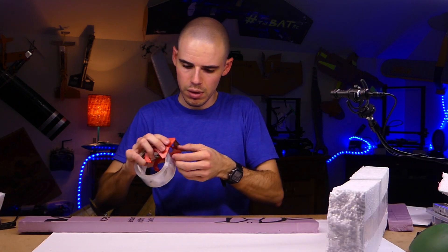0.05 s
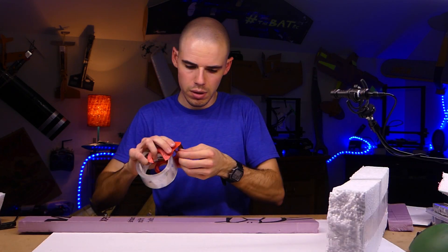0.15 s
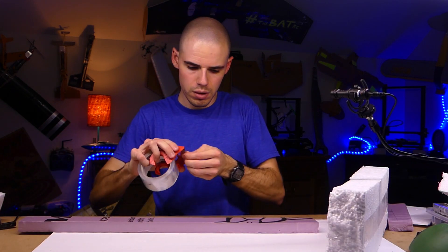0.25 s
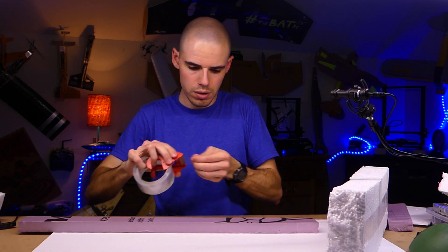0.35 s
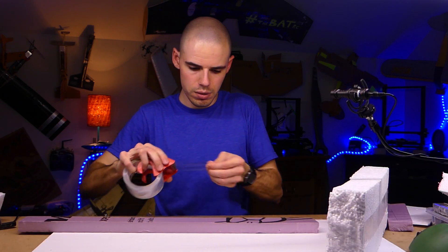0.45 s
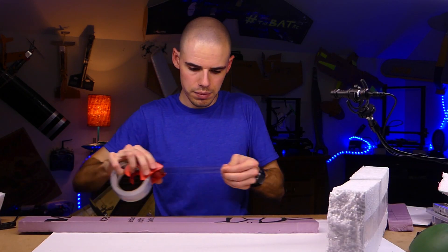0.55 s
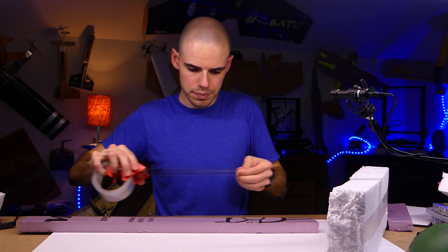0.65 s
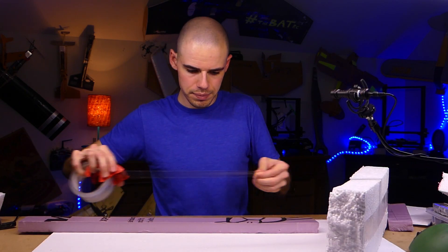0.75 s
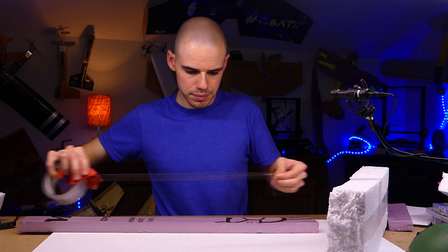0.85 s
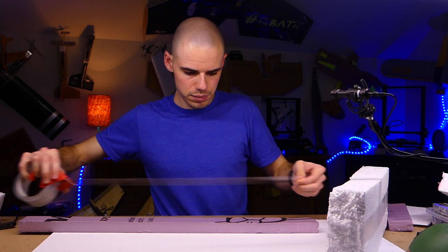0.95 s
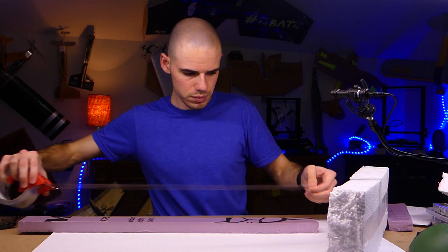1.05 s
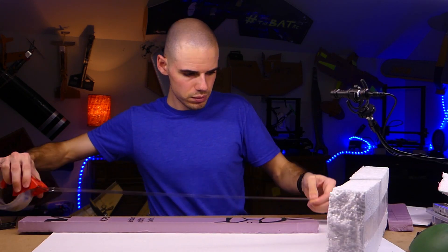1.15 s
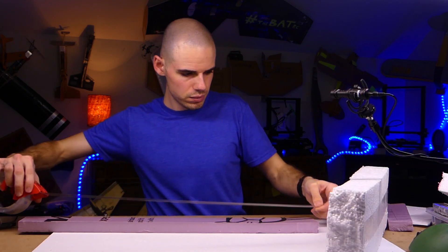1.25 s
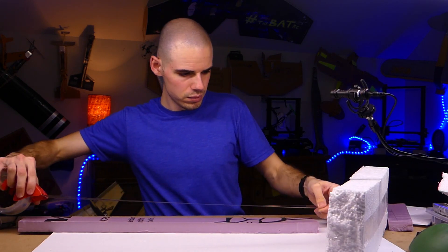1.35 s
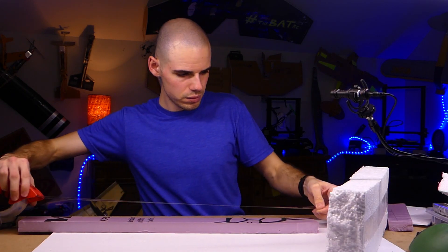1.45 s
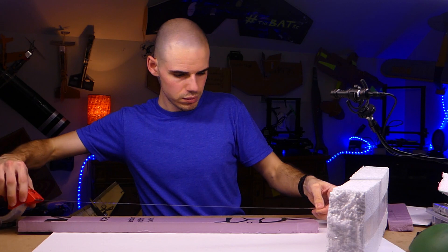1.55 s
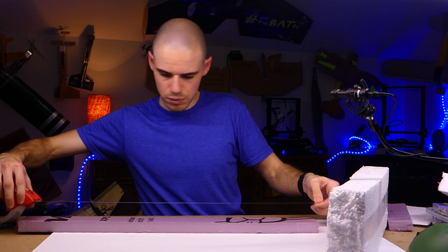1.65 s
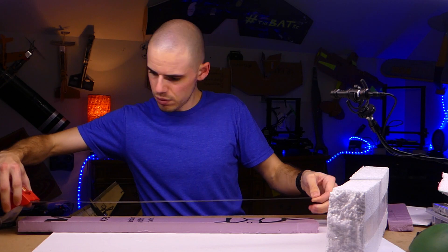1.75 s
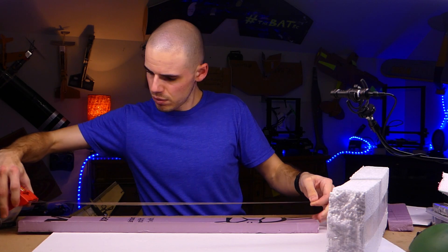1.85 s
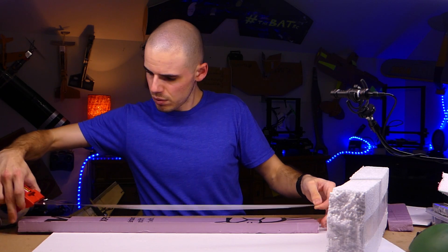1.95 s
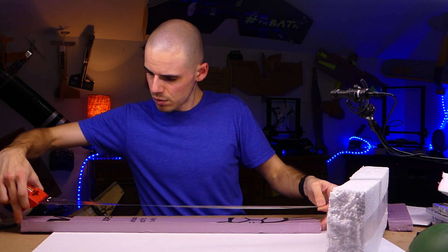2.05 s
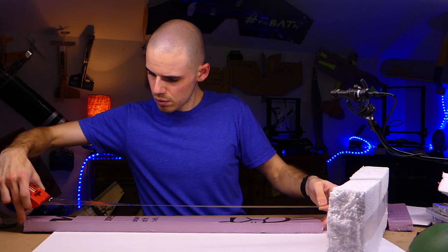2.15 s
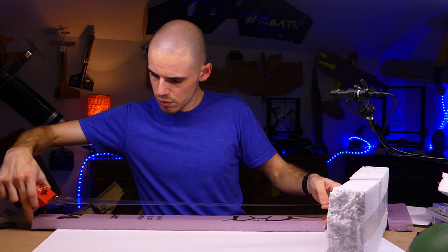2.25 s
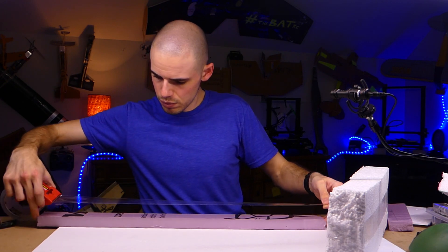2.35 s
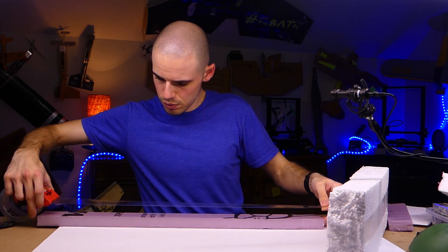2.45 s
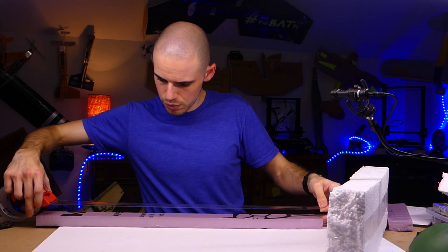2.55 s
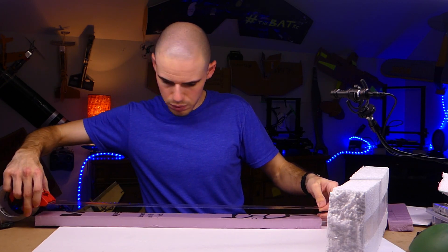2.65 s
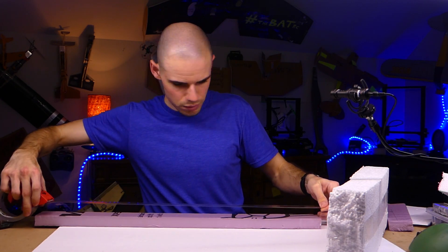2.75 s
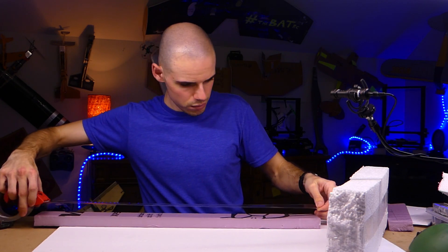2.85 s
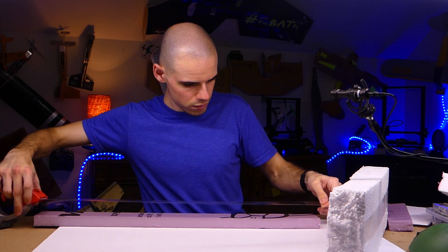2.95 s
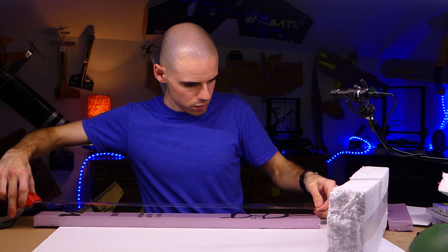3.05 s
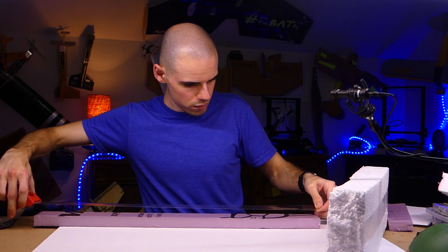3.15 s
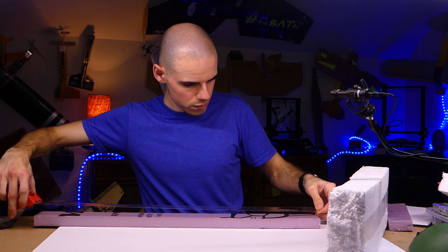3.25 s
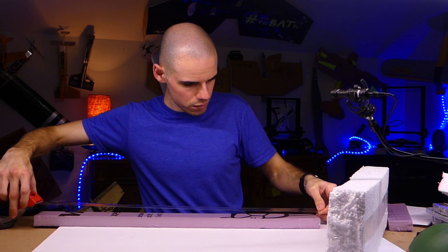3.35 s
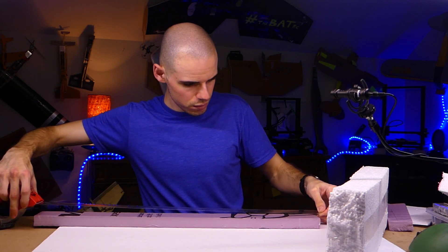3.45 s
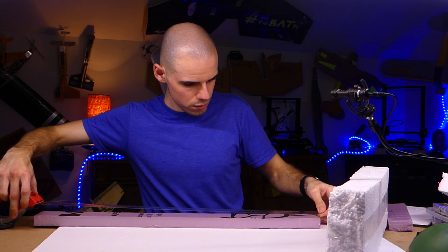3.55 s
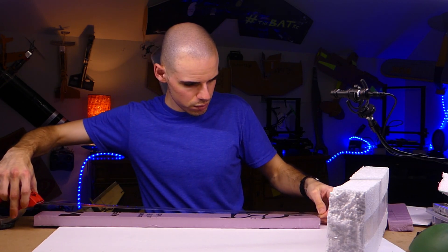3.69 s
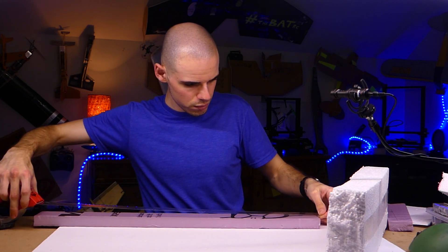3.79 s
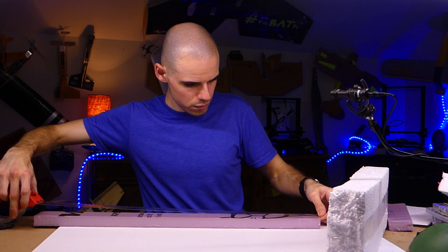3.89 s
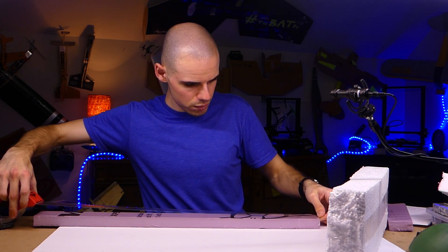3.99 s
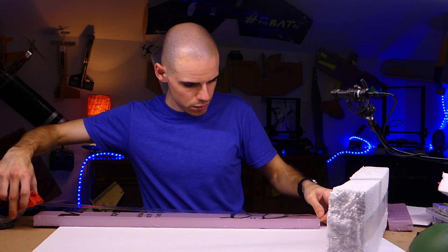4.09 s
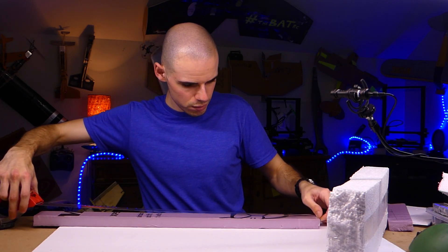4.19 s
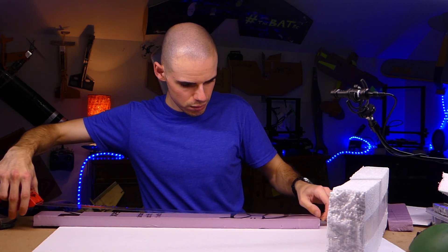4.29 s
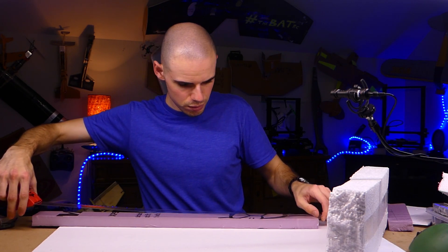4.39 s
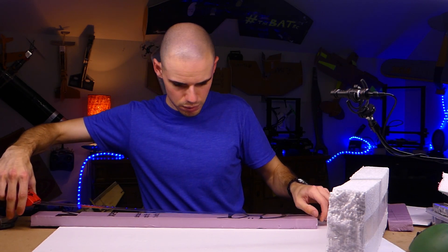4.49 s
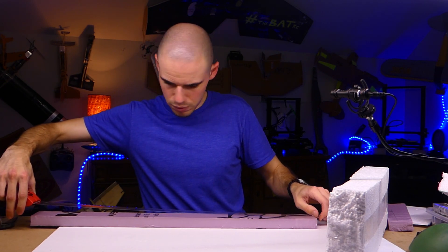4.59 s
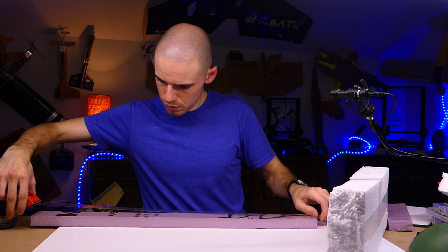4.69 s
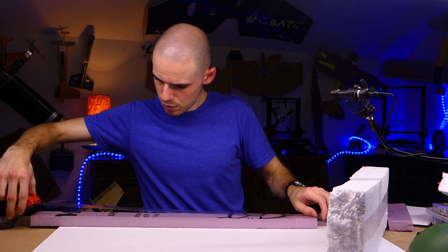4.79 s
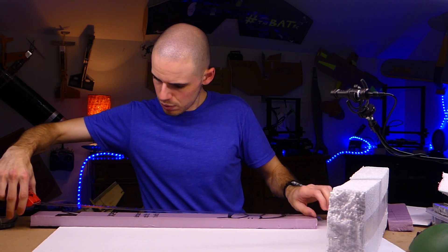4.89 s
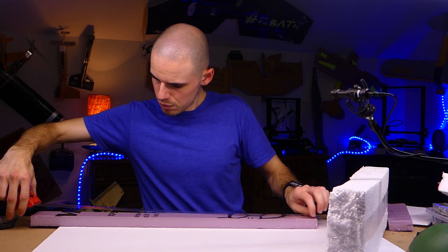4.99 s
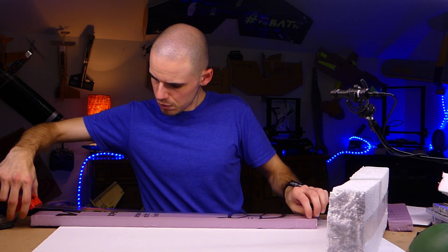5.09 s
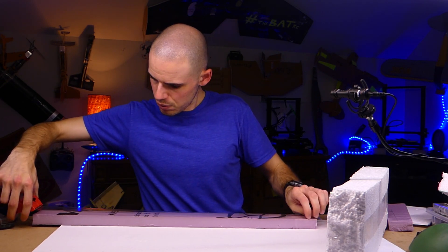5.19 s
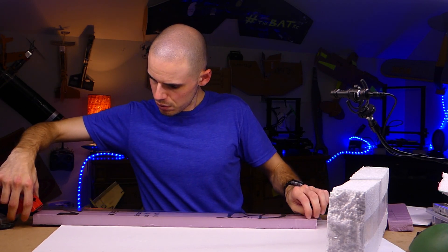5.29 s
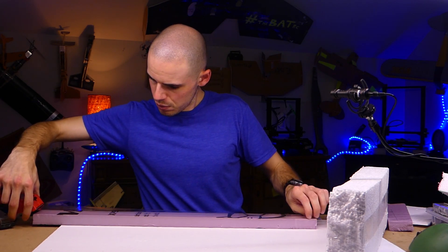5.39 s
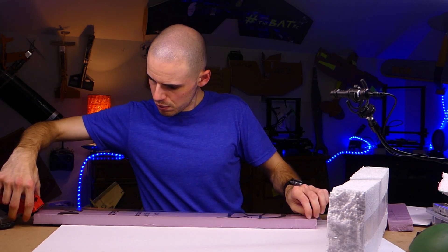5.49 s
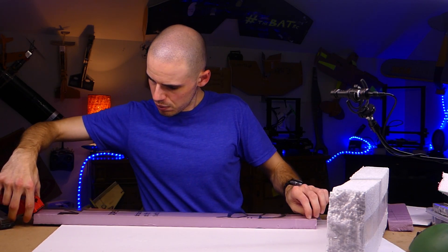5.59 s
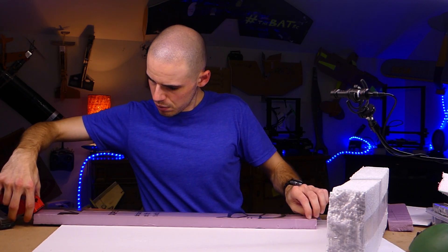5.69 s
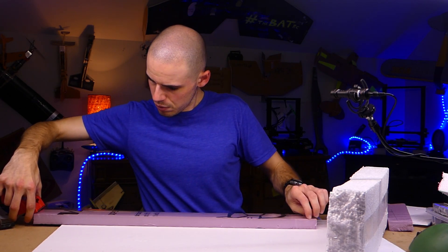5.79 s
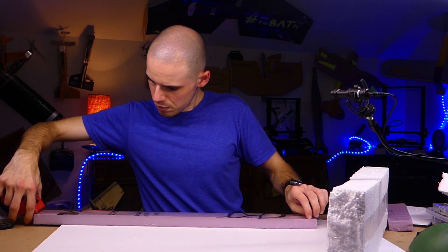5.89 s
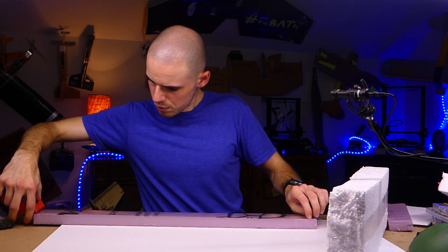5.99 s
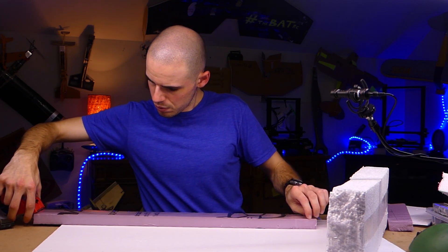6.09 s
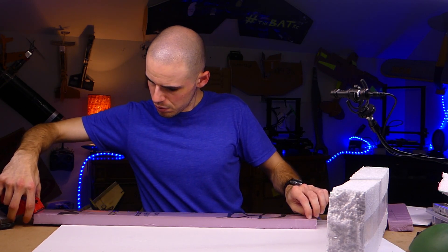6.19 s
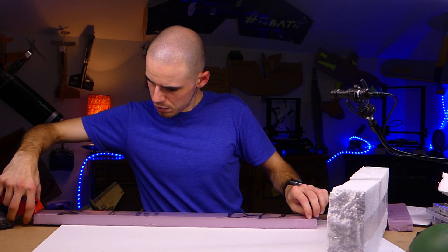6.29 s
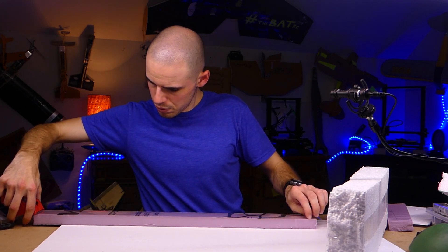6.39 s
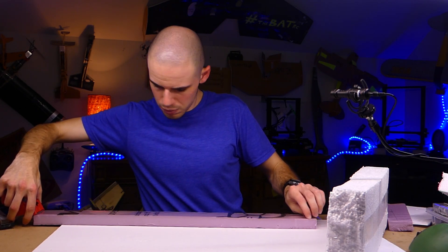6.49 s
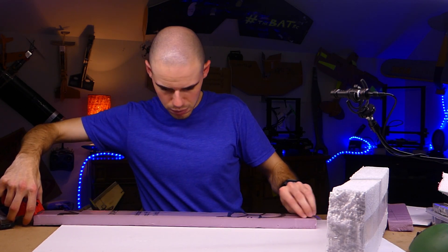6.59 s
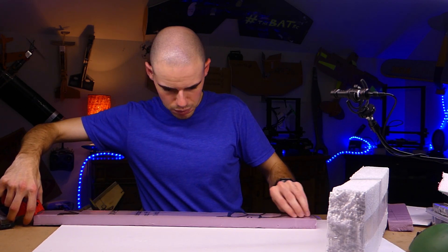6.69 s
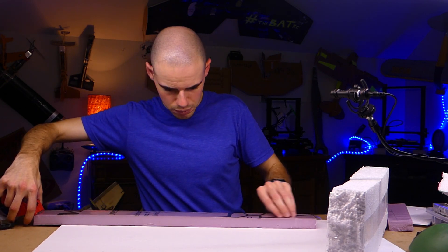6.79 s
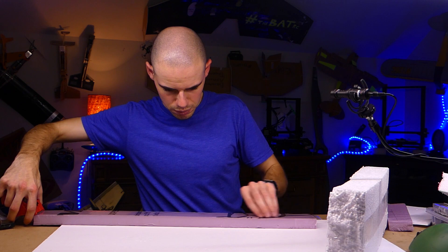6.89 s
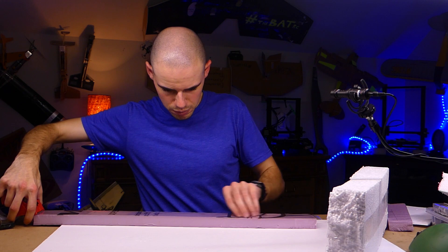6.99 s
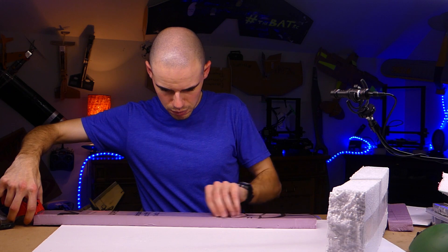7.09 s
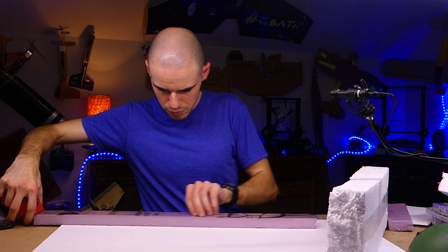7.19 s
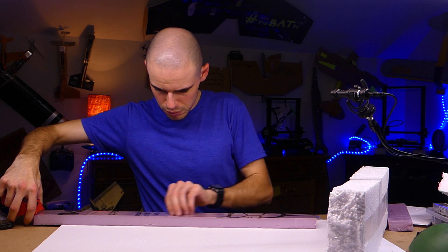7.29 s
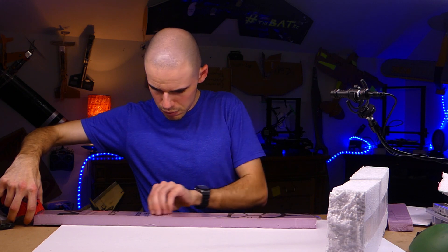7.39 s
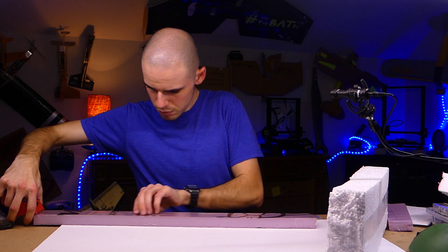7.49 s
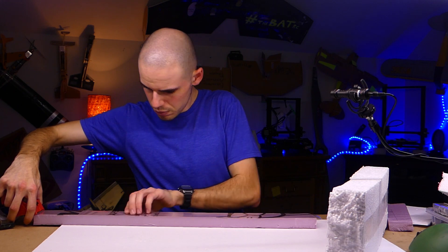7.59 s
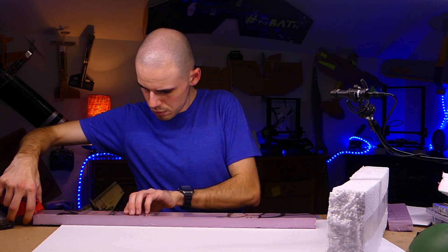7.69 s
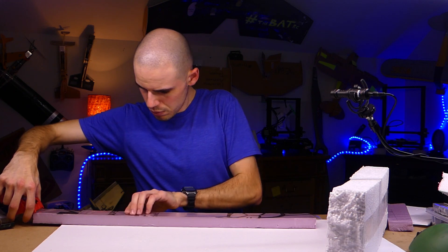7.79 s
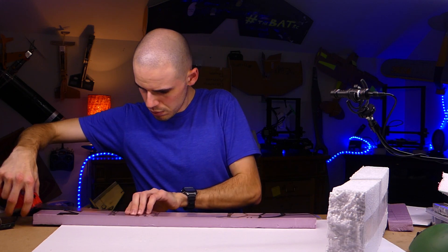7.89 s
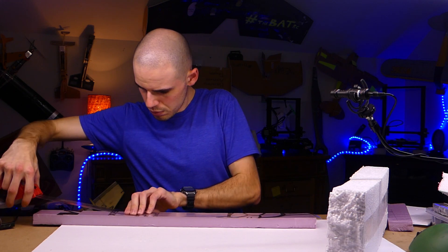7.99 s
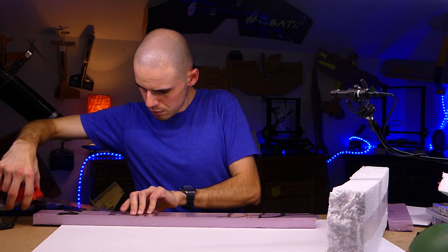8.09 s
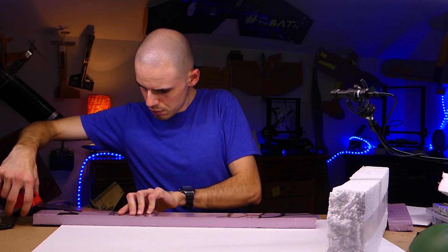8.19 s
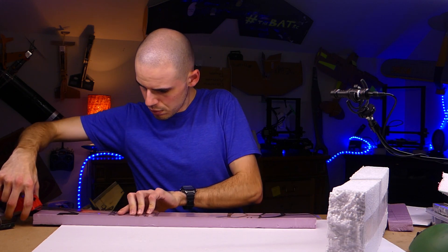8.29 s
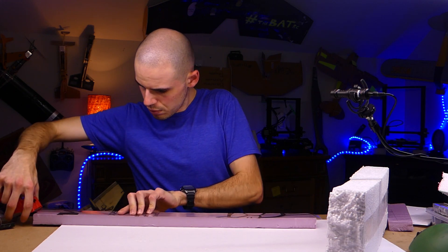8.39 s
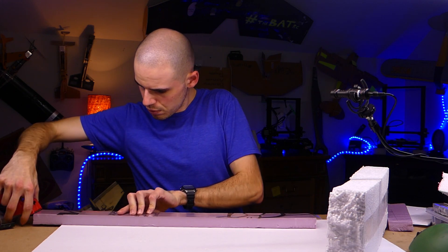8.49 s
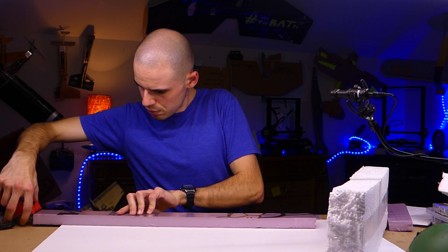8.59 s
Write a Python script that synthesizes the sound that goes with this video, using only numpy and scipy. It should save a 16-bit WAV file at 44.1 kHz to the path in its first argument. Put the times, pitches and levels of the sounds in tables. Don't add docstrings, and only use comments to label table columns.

```python
import sys
import numpy as np
from scipy import signal
from scipy.fft import rfft, irfft, next_fast_len
from scipy.io import wavfile
from scipy.ndimage import uniform_filter1d, map_coordinates

SR = 44100
rng = np.random.default_rng(int(sys.argv[2]) if len(sys.argv) > 2 else 0)


def volts_from_db(level):
    exponent = np.asarray(level, float) / 20
    return 10 ** exponent


def to_wav(sig):
    pcm = np.clip(np.atleast_2d(sig), -1, 1) * 32767
    pcm = np.round(pcm).astype(np.int16)
    wavfile.write(sys.argv[1], SR, pcm.T)


N = 381465

# time_s, level_db, slips_per_s
RIP = [
    (.64, -33, 150),
    (.72, -35.5, 167),
    (.78, -36, 180),
    (.87, -37.5, 231),
    (1.0, -37, 310),
    (1.08, -37.5, 280),
    (1.15, -36, 220),
    (1.161, -35.5, 240),
]
# start_s, level_db, length_ms
JERKS = [(.31, -60, 1.5), (.3256, -30, 0.43), (.325, -38.5, 4.1), (0.3315, -29, 0.63), (0.3331, -25, 0.74),
         (.337, -35.5, 17), (0.338, -37, 1.5), (0.342, -32, 1.5), (0.353, -29, .6), (.3558, -28.5, 1.3),
         (.357, -35, 12), (0.3613, -28, .6), (.3752, -25, 1.5), (.378, -25.5, 2), (.3825, -32.5, 3),
         (0.4244, -27, 8.4), (.47, -29.5, 3.6), (.4745, -31, 10.7), (.488, -35.5, 7.9), (.499, -27.5, 1),
         (0.5018, -33.5, 7.6), (.51, -31, 5.5), (0.517, -29.5, 4.9), (.532, -30, 8), (0.5399, -31.5, 4),
         (0.5573, -32, 8.1), (.5635, -32.5, 0.89), (.578, -30.5, 14), (0.604, -31.5, 18),
         (0.6237, -30.5, .2), (0.6256, -33.5, 1.5), (.636, -31, 2), (.671, -33.5, 6.6), (0.686, -35.5, 5.4),
         (.705, -33, 9.7), (.72, -31, .2),
         (1.1496, -32.5, 0.44), (1.166, -33, 1.1), (1.176, -35, 4.9), (1.184, -34, 2),
          (1.189, -32.5, 0.89), (1.198, -34, 1.8), (1.2156, -33, 1.5), (1.221, -33, 0.85),
          (1.348, -37.5, 3), (1.3528, -32, 1.3), (1.3572, -32, 2), (1.37, -34.5, 1), (1.372, -32.5, 2.3),
          (1.3899, -31.5, 2.8), (1.395, -28, 1.1), (1.4184, -35.5, 1.1), (1.42, -33.5, 1.6)]
# start_s, level_db, length_ms, rise_ms
TUGS = [(2.833, -51.5, 4, 3.5), (2.9961, -48, 3.6, 2.5), (7.983, -31, 4, 1), (2.8371, -22, 3, 1.6),
        (2.8428, -25, 3.7, 1.2), (2.857, -25.5, 2, 1.3), (2.8727, -33.5, 1.8, 1.2), (2.876, -37, 1.35, .5),
        (2.879, -32.5, 2.5, 1.03), (2.902, -39, .8, 0.27), (2.908, -37.5, .6, 0.14), (3, -26.5, 1.8, .8),
        (3.0052, -21.5, 2.8, 2.1), (3.023, -24.5, 1.2, 1.8), (3.046, -28.5, 5.7, 0.74),
        (3.0527, -34, .4, .1), (3.072, -30, 1.1, 0.37), (3.087, -26.5, 0.92, .5), (4.914, -50, 0.46, .1),
        (4.9207, -35.5, 2.8, 0.18), (4.929, -44, 4.6, .3), (7.978, -27.5, 2.1, 0.28), (8.001, -33.5, 3, 1),
        (8.0114, -31, 2, 0.77), (8.022, -30.5, 1.5, 0.34)]
# time_s, ring_db
TENSION = [(.3, -10), (.45, -7), (.5, -1.5), (.66, -1.5), (.78, -7.5), (1.0, -14), (1.4, -12), (2.9, -14),
           (3.0, -27.5), (3.07, -25), (3.09, -11.5), (4.9, -13), (8, -9.5)]
# pitch_hz, level_db
GLUE = [(110, -62), (200, -19.5), (300, -12.5), (367, -6), (413, -19), (488, -26.5), (549, -20), (627, 0.5),
        (730, -4), (2210, -0.5), (7020, 0), (8730, 1), (15200, -9), (16500, -53)]
RISE_SHARE = 0.06


def peel():
    now = np.arange(N) / SR
    rip_db, slips_per_s = curves(RIP, fade=0.0077)
    tension_db = np.interp(now, *np.transpose(TENSION))
    slipping = stutter(slips_per_s, scatter=0.9, decay_ms=0.9, size_db=1.5)
    force = volts_from_db(rip_db) * mottled(slipping, 1.8, 6, 8)
    fizz = force * volts_from_db(-22.5 - 0.8 * tension_db)
    strip = force * volts_from_db(1.5 * tension_db - 6.0)
    core = force * volts_from_db(0.9 * tension_db - 15.0)
    edge = edge_rings(force)

    t = np.arange(SR // 20) / SR
    threads = crackle(1500, spread_db=2.2)
    jerks = [(*row, RISE_SHARE * row[2]) for row in JERKS]
    for start_s, db, length_ms, rise_ms in [*jerks, *TUGS]:
        at = slice(round(start_s * SR), round(start_s * SR) + len(t))
        ring_db = tension_db[at.start]
        shape = slip_shape(t, length_ms, rise_ms)
        burst = volts_from_db(db - 1.0) * unit(shape * threads[at]) * np.sqrt(np.mean(shape ** 2))
        force[at] += burst * volts_from_db(min(0.5 * (ring_db + 14.5), 0))
        fizz[at] += burst * volts_from_db(-0.8 * ring_db - 19.5)
        strip[at] += burst * volts_from_db(1.6 * ring_db - 4)
        core[at] += burst * volts_from_db(0.76 * ring_db - 12.5)

    out = filtered(force, colour(GLUE)) + strip_and_roll(strip, core) + edge
    out = out + filtered(fizz, modes([(13600, 28000, 0)]))
    return hand_shadow(out)


def slip_shape(t, length_ms, rise_ms):
    overtime = np.maximum(t - length_ms / 1000, 0)
    hold = volts_from_db(-350 * t - 60 * overtime / 0.011)
    rise = np.minimum(t / (rise_ms / 1000 + 1e-5), 1) ** 2
    crack = np.exp(-length_ms / 3 - abs(t - rise_ms / 1000) / 0.0004)
    return hold * rise * (1 + crack)


# pitch_hz, width_hz, level_db, centre_s, span_s
EDGE = [(2250, 300, -12, .7, .08), (2200, 400, -17, .85, .08), (4850, 450, -6.5, .78, .045),
        (5350, 350, -8, .86, .055), (5250, 400, -13, 1.09, .06), (4000, 300, -16, 1.1, .06),
        (8400, 800, -11, .84, .06), (8800, 800, -12, .96, .07), (8900, 900, -15, 1.12, .07)]


def edge_rings(force):
    now = np.arange(N) / SR
    edge = np.zeros(N)
    for hz, width, db, centre_s, span_s in EDGE:
        swell = np.exp(-((now - centre_s) / span_s) ** 2)
        edge += filtered(force * volts_from_db(db) * swell, modes([(hz, width, 0)]))
    return filtered(edge, low_cut(300, 2))


# pitch_hz, width_hz, level_db
FILM = [(1970, 600, 22.5), (1750, 180, -11.5)]
# pitch_hz, width_hz, level_db
ROLL = [(472, 70, 2.5), (597, 57, 0.5)]
# time_s, stretched_share
STRETCH = [(.55, 0), (.66, 1), (1.3, 1), (1.34, 0)]


def strip_and_roll(strip, core):
    pulled = np.interp(np.arange(N) / SR, *np.transpose(STRETCH))
    taut = [(hz * 1.1, width, db) for hz, width, db in FILM]
    slack_ring = filtered(strip * np.sqrt(1 - pulled), steep_modes(FILM))
    taut_ring = filtered(strip * np.sqrt(pulled), steep_modes(taut))
    return slack_ring + taut_ring + filtered(core, steep_modes(ROLL))


# pitch_hz, sharpness, centre_s, span_s, depth_share
SHADOW = (11000, 7, .6, .17, .85)


def hand_shadow(x):
    hz, sharpness, centre_s, span_s, depth = SHADOW
    when = np.exp(-((np.arange(N) / SR - centre_s) / span_s) ** 4)
    return x - depth * when * signal.lfilter(*signal.iirpeak(hz, sharpness, SR), x)


# pitch_hz, level_db
SKIN = [(180, -27), (300, -12), (386, -7), (1380, -3.5), (1800, -2.5), (3590, -2.5), (5020, -2.5),
        (5830, -0.5), (12000, -8.5), (15400, -9.5), (16500, -38.5)]
# pitch_hz, width_hz, level_db
BOARD = [(1900, 890, -7), (2550, 200, -20), (5330, 600, -3), (7300, 980, -4), (8550, 840, 7)]


def rubbing():
    touch = unit(mottled(crackle(500, spread_db=2), 2.3, 3, 30))
    level_db, bright_db = strokes()
    specks = (rng.random(N) < 40 / SR) * volts_from_db(8 + 3 * rng.standard_normal(N))
    specks = specks * volts_from_db(-0.8 * np.maximum(level_db + 67.5, 0))
    touch = touch * (1 + signal.lfilter([1], [1, -0.97], specks) * volts_from_db(-6))
    grain = filtered(touch, colour(SKIN))
    board = filtered(touch, modes(BOARD))
    tilt = filtered(grain, lambda hz: 1 / (1 + (4500 / (hz + 1)) ** 4)) * 0.44
    plain = grain + tilt * (volts_from_db(bright_db - 2.0) - 1)
    pressed = volts_from_db(0.5 * (level_db + 47.5) - 14.5) * board
    return volts_from_db(level_db + 1.1 * wobble(25)) * (plain + pressed)


# peak_s, rise_s, fall_s,
# level_db, brightness_db
HAND_STROKES = [(.11, 0.023, 0.013, -71, 5), (2.29, 0.017, .05, -53.5, 6), (2.66, 0.024, 0.045, -58, 9),
                (.2, 0.03, 0.24, -66, -30), (1.28, .06, 0.053, -65, -2), (1.58, 0.091, 0.21, -56, -1),
                (1.92, 0.14, 0.078, -54, 1), (2.07, 0.0047, 0.046, -51, 4), (2.201, 0.059, 0.031, -52, -14),
                (2.391, 0.12, 0.17, -52, 14), (2.58, 0.011, 0.011, -56, 8.5), (2.76, 0.14, 0.077, -56, -8),
                (3.5, 0.11, 0.16, -73.5, -5), (3.75, 0.21, 0.26, -85, 7),
                (4.06, 0.032, 0.18, -65.5, 3), (4.27, 0.077, 0.058, -62.5, -4), (4.33, 0.11, 0.036, -61, 5),
            (4.47, 0.07, 0.2, -56, 4.5), (4.6, 0.1, 0.11, -59.5, -4), (4.689, 0.022, .025, -62, 6),
            (4.86, 0.018, 0.12, -70, 8), (4.96, 0.26, 0.45, -82, 26), (5.04, .04, 0.039, -71, 2),
            (5.17, 0.032, .04, -65.5, -4), (5.25, 0.058, 0.1, -54.5, 15), (5.33, 0.24, 0.049, -52.5, -2),
            (5.46, 0.038, 0.066, -58.5, -26), (5.6, 0.1, 0.045, -57.5, -3), (5.7, 0.0099, 0.034, -67, 10),
            (6.01, 0.084, 0.025, -62.5, -16), (6.14, 0.018, 0.017, -68.5, 10), (6.26, .05, 0.044, -75, 14),
            (6.35, 0.0065, 0.047, -60, 4), (6.46, 0.045, 0.2, -65, 3), (6.665, 0.027, 0.02, -46.5, -17),
            (6.74, 0.018, .02, -56, -1), (7.86, 0.16, 0.044, -61, -2), (7.95, 0.038, 0.057, -55.5, -1),
            (8.2, 0.014, 0.1, -72.5, 13), (8.55, 0.05, 0.019, -68, -12)]
# time_s, level_db, brightness_db
SWEEP = [
    (6.68, -60, 1.5),
    (6.92, -58, 11),
    (7.13, -51, 8.5),
    (7.28, -50.5, 4.5),
    (7.5, -48, 9),
    (7.655, -46, 3),
    (7.668, -52, 5),
    (7.76, -62, -15),
]
# centre_s, width_s, change_db
LIFT = (3.34, 0.11, -8)


def strokes():
    t = np.arange(0, N, 32) / SR
    level_db, bright_db = (c[::32] for c in curves(SWEEP, fade=0.03))
    lift_s, lift_width_s, lift_db = LIFT
    rest_db = -80 + lift_db * np.exp(-((t - lift_s) / lift_width_s) ** 2)
    power = volts_from_db(2 * level_db) + volts_from_db(2 * rest_db)
    bright = bright_db * volts_from_db(2 * level_db)
    for peak_s, rise_s, fall_s, db, tone_db in HAND_STROKES:
        away = np.where(t < peak_s, (peak_s - t) / rise_s, (t - peak_s) / fall_s)
        swell = volts_from_db(2 * (db - 15 * away ** 1.77))
        power = power + swell
        bright = bright + tone_db * swell
    return [np.interp(np.arange(N) / SR, t, c) for c in (10 * np.log10(power), bright / power)]


# start_s, end_s, from_hz, to_hz, level_db
SINGS = [(1.47, 1.73, 1590, 1640, -71), (1.72, 1.87, 1600, 1570, -71), (1.54, 1.75, 1090, 1110, -68),
         (1.73, 1.87, 1110, 1090, -67), (1.86, 1.97, 1090, 1110, -69), (2.64, 2.76, 1100, 1110, -72),
         (6.75, 7.15, 5350, 5450, -66), (6.85, 7.2, 2500, 2550, -66), (7.15, 7.6, 1900, 2000, -61),
         (7.42, 7.57, 4600, 5250, -51), (7.3, 7.47, 4300, 4500, -58), (7.45, 7.6, 2400, 2600, -60),
         (7.6, 7.665, 8300, 8800, -57), (7.1, 7.3, 3000, 2900, -65)]


def whistles():
    out = np.zeros(N)
    for start_s, end_s, from_hz, to_hz, db in SINGS:
        n = round((end_s - start_s) * SR)
        half_width_hz = 0.015 * from_hz
        slow = signal.lfilter([1], [1, -np.exp(-2 * np.pi * half_width_hz / SR)], rng.standard_normal(n))
        tone = np.sin(2 * np.pi * np.cumsum(np.linspace(from_hz, to_hz, n)) / SR)
        out[round(start_s * SR):][:n] += volts_from_db(db) * np.hanning(n) ** 0.5 * unit(slow * tone)
    return out


# start_s, end_s, start_db, end_db
SQUEAK = [
    (1.526, 1.717, -85, -71),
    (1.768, 1.81, -72, -82),
    (1.883, 1.98, -67, -77.5),
    (2.634, 2.731, -77, -81),
]
# pitch_hz, width_hz, level_db
FRAME = [(1090, 37, -0.5), (1610, 45, -5), (4500, 150, -11.5)]


def squeaks():
    drag = filtered(rng.standard_normal(N), modes(FRAME)) * volts_from_db(2.2 * wobble(11))
    level = 0
    for start_s, end_s, start_db, end_db in SQUEAK:
        level = level + volts_from_db(curves([(start_s, start_db), (end_s, end_db)], fade=0.066)[0] + 10.0)
    return level * drag


# start_s, peak_db, pitch_hz
TICKS_TAPE = [(3.2586, -51, 7000), (.3257, -15, 7500), (.6243, -13.5, 9000), (2.8388, -15.5, 9500),
              (3.0079, -13.5, 10000), (7.947, -41, 5000), (0.097, -42, 6000), (.129, -52, 8000),
              (0.192, -47, 5000), (0.232, -35, 9000), (0.259, -40, 8700), (3.522, -41.5, 7000),
              (6.35, -32, 6000), (8.374, -50.5, 4020), (0.1791, -36, 3840), (1.495, -42, 3500),
              (1.5464, -37, 5440), (1.7051, -41, 5870), (2.0791, -28.5, 3960), (2.485, -28, 5330),
              (2.574, -43, 8170), (4.2263, -42, 6600), (4.3814, -45.5, 8560), (4.4992, -37, 5850),
              (4.6794, -36, 6840), (4.717, -52, 5000), (4.814, -48.5, 6000), (4.8613, -49, 8550),
              (4.8817, -40, 10300), (4.9228, -19.5, 2880), (4.9253, -18.5, 4500), (4.934, -24, 3460),
              (4.936, -23.5, 3480), (4.0401, -58.5, 7960), (4.312, -51, 9000), (4.332, -42, 9000),
              (5.5407, -47, 6240), (5.667, -46, 5750), (6.248, -46, 8460), (6.516, -46, 4980),
              (6.6517, -41, 4280), (4.999, -42.5, 3470), (5.075, -50, 6150), (5.1245, -46.5, 5500),
              (5.148, -40, 3800), (5.4625, -38, 5100), (6.2675, -43, 8070), (6.4672, -41, 5010),
              (6.5356, -39, 4970), (6.5607, -37.5, 3500), (6.6664, -33, 6000), (7.601, -20.5, 5100),
              (7.672, -29.5, 7700), (7.9232, -38, 4500), (7.94, -34, 9200), (7.812, -50, 7000),
              (7.969, -41, 7000), (7.9794, -6.5, 3900), (7.9817, -11, 3700), (7.9842, -16.5, 4970),
              (7.984, -24, 4000), (7.986, -14.5, 2970), (8.1864, -58, 3470), (8.2556, -46, 7200)]
# start_s, peak_db, pitch_hz, length_ms
TICKS_NAIL = [(0.097, -53, 2060, 2.4), (0.2322, -32, 1980, 2.7), (0.2591, -34.5, 2100, 1.9),
              (2.6698, -38.5, 1600, 3.7), (3.2584, -55, 1480, 1.8), (3.5209, -48.5, 1620, 5.6),
              (4.344, -35.5, 2660, 3.7), (4.7665, -46.5, 1480, 5), (4.9116, -33.5, 1500, 2.4),
              (5.382, -46, 1600, 3.2), (5.512, -47, 1630, 2.2), (3.6131, -60, 1560, 2),
              (5.1245, -46, 1520, 2.9), (5.697, -38.5, 2400, 2.1), (5.8705, -53, 1610, 2.2),
              (5.927, -47, 1530, 1.8), (6.133, -55, 2890, 2), (6.2132, -41, 1750, 1.7),
              (6.351, -36.5, 2346, 2.3), (6.438, -43.5, 1600, 4.8), (6.585, -23.5, 2940, 2.2),
              (7.9394, -43, 3000, 1.8), (7.946, -40.5, 1500, 1.5), (7.9515, -38.5, 2200, 1.06),
              (7.9561, -36.5, 2200, 1.2), (8.192, -39, 1630, 3), (8.306, -52.5, 2650, 2.1),
              (8.3739, -49, 1926, 2.5)]


def ticks():
    out, t = np.zeros(N + SR), np.arange(SR // 25) / SR
    tape_ticks = [(*row, 1.9) for row in TICKS_TAPE]
    for start_s, db, hz, length_ms in [*tape_ticks, *TICKS_NAIL]:
        fade = volts_from_db(-8.7 * t / 0.00042) + 2.1 * volts_from_db(-8700 * t / length_ms)
        crack = rng.standard_normal(len(t)) * fade
        band = signal.iirpeak(hz, 0.7, SR)
        tone = signal.lfilter(*band, signal.lfilter(*band, crack))
        tone = tone + 0.084 * np.diff(crack, prepend=0)
        out[round(start_s * SR):][:len(t)] += volts_from_db(db - 3) * tone / abs(tone).max()
    return filtered(out[:N], low_cut(120, 2))


# start_s, peak_db, pitch_hz, time_to_fall_60_db_s
KNOCKS = [(2.063, -43, 530, 0.023), (2.441, -41.5, 580, 0.029), (2.624, -45, 253.6, 0.036),
          (4.922, -40, 783, 0.041), (5.21, -42.5, 630, 0.021), (5.34, -45, 420, 0.036),
          (5.465, -51, 405, 0.058), (5.515, -49, 330, 0.03), (5.825, -54, 520, 0.028),
          (6.025, -62, 560, 0.036), (5.27, -52, 700, 0.026), (5.61, -54, 325, 0.023),
          (5.925, -46.5, 437, 0.024), (7.979, -21.5, 1145, 0.013), (7.9822, -25.5, 1440, 0.012),
          (7.98, -25, 687, 0.053), (7.9795, -30.5, 1005, 0.028)]
# start_s, pitch_hz, level_db, time_to_fall_60_db_s
CORE_RING = (7.995, 672, -48, .42)


def knocks():
    out, t = np.zeros(N + SR), np.arange(SR // 2) / SR
    ring_s, ring_hz, ring_db, ring_fall_s = CORE_RING
    for start_s, db, hz, fall_s in [*KNOCKS, (ring_s, ring_db, ring_hz, ring_fall_s)]:
        drift = 0.0034 * np.cumsum(rng.standard_normal(len(t)))
        ring = np.sin(2 * np.pi * hz * t + drift)
        ring += 0.31 * np.sin(2 * np.pi * 1.3 * hz * t + drift) * volts_from_db(-1500 * t)
        ring += 0.06 * np.sin(2 * np.pi * 0.42 * hz * t) * volts_from_db(-900 * t)
        out[round(start_s * SR):][:len(t)] += volts_from_db(db - 60 * t / fall_s) * ring
    return filtered(out[:N], low_cut(120, 2))


# pitch_hz, time_to_fall_60_db_s
WALLS = [(300, 0.48), (2000, 0.36), (6000, 0.29), (14000, 0.2)]


def room(x, count=5):
    hz, t, z = signal.stft(rng.standard_normal((count, SR // 3)), SR, nperseg=256)
    tails = signal.istft(z * volts_from_db(-60 * t / along(WALLS, hz)[:, None]), SR, nperseg=256)[1]
    tails = tails / np.linalg.norm(tails, axis=1, keepdims=True)
    place = np.arange(N) // 256 % count == np.arange(count)[:, None]
    echo = signal.oaconvolve(x * place, tails, axes=1).sum(0)
    echo = np.pad(echo, (200, 0))[:N]
    return filtered(echo, low_cut(200, 3))


# pitch_hz, level_db
HUM = [(65, -30), (110, -3.5), (157, -5.5), (463, -15.5), (514, -13.5), (732, -12.5), (1010, -21),
       (2500, -39), (3250, -72), (5500, -120)]
# pitch_hz, level_db
HISS = [(590, -40.5), (1000, -6), (1120, 1), (5950, -16), (15200, -3.5), (16500, -20)]
# centre_s, width_s, change_db
BUMPS = [(.5, 0.22, 15), (.93, 0.11, -9), (1.17, 0.09, 14), (2.12, 0.047, 11.5), (2.9, 0.065, 7),
         (3.9, 0.6, 8), (5.101, 0.21, 11), (5.6, 0.53, 6.5), (6.8, 0.22, 5), (7.44, 0.27, 7),
         (8.13, 0.13, 11.5), (8.5, 0.151, 5.5), (1.35, 0.15, 8.5)]


def air(loud):
    t = np.arange(N) / SR
    keep = np.exp(-1 / (0.24 * SR))
    power = signal.lfilter([1 - keep], [1, -keep], loud ** 2)
    gain_db = -0.41 * 10 * np.log10(1 + power / volts_from_db(2 * -63))
    weight_db = sum(db * np.exp(-((t - s) / width) ** 2) for s, width, db in BUMPS)
    hum = filtered(rng.standard_normal(N), colour(HUM))
    hum = hum * volts_from_db(-65 + gain_db + 0.51 * weight_db + 2.0 * wobble(7.7))
    hiss = volts_from_db(-71.5 + 1.4 * gain_db) * filtered(rng.standard_normal(N), colour(HISS))
    bench = modes([(28, 35, 0), (70, 50, -2)])
    rumble = filtered(rng.standard_normal(N), lambda f: bench(f) / (1 + (f / 120) ** 2))
    rumble = rumble * volts_from_db(-72.5 + 1.2 * gain_db + weight_db + 1.3 * wobble(6.5))
    return hum + hiss + rumble


def stutter(rate, scatter, decay_ms, size_db):
    count = np.cumsum(rate * volts_from_db(scatter * wobble(150))) / SR
    starts = np.diff(np.floor(count), prepend=0) > 0
    starts = starts * volts_from_db(size_db * rng.standard_normal(N))
    shape = signal.lfilter([1], [1, -np.exp(-1000 / (decay_ms * SR))], starts)
    return unit((shape + 0.25 + rate / 1500) * rng.standard_normal(N))


def crackle(rate, spread_db):
    return unit(rng.standard_normal(N) * volts_from_db(spread_db * wobble(rate)))


def mottled(x, depth_db, bins, frames):
    z = signal.stft(x, nperseg=512)[2]
    field = uniform_filter1d(rng.standard_normal(z.shape), bins, 0)
    field = uniform_filter1d(field, frames, 1)
    return signal.istft(z * volts_from_db(depth_db * unit(field)), nperseg=512)[1][:N]


def wobble(rate):
    knots = rng.standard_normal(int(N * rate / SR) + 4)
    return map_coordinates(knots, [np.arange(N) * rate / SR])


def unit(x):
    return x / np.sqrt(np.mean(x ** 2) + 1e-20)


def along(points, hz):
    f, v = np.transpose(points)
    return np.interp(np.log(hz + 1), np.log(f + 1), v)


def curves(rows, fade=0.009):
    s, level, *rest = np.transpose(rows)
    t = np.arange(N) / SR
    level = np.interp(t, [s[0] - fade, *s, s[-1] + fade], [-120, *level, -120])
    return [level] + [np.interp(t, s, c) for c in rest]


def filtered(x, response):
    m = next_fast_len(N + 8192)
    gain = response(np.fft.rfftfreq(m, 1 / SR))
    gain = gain / np.sqrt(np.mean(abs(gain) ** 2))
    return irfft(rfft(x, m) * gain, m)[..., :N]


def modes(table):
    def response(f):
        total = 0
        for k, (hz, width, db) in enumerate(table):
            total = total + (-1) ** k * volts_from_db(db) * 1j * f * width / (hz * hz - f * f + 1j * f * width)
        return total
    return response


def steep_modes(table):
    return lambda f: modes(table)(f) ** 2


def low_cut(hz, order):
    return lambda f: (1j * f / (hz + 1j * f)) ** order


def colour(points):
    return lambda hz: volts_from_db(along(points, hz))


# time_s, room_db
REACH = [
    (0, -19),
    (.45, -18),
    (.7, -5.5),
    (1.2, -9.5),
    (2.8, -10),
    (3.1, -9.5),
    (8.65, -13.5),
]


def scene():
    tape, taps = peel(), ticks() + knocks()
    hand = rubbing() + squeaks() + whistles()
    echo = room(volts_from_db(curves(REACH)[0]) * tape + volts_from_db(-17.5) * taps)
    mono = tape + taps + hand + echo + air(tape + volts_from_db(-5.5) * taps)
    return np.array([mono, mono])


def band_limit(x):
    return signal.sosfilt(signal.butter(12, 16800, fs=SR, output="sos"), x)


def record(dry):
    mid = signal.lfilter(*signal.iirnotch(5930, 60, SR), dry[0])
    mid = mid / (1 + abs(mid / 0.25) ** 4) ** (1 / 4)
    limit = np.interp(np.fft.rfftfreq(N, 1 / SR), [15800, 16000, 16650, 16700], [0.94, 0.092, 0.04, 0])
    mid = irfft(rfft(mid) * limit, N)
    z = signal.stft(mid, nperseg=256)[2]
    scrambled = abs(z) ** 0.86 * np.exp(2j * np.pi * rng.random(z.shape))
    side = signal.istft(scrambled, nperseg=256)[1][:N]
    tint = colour([(60, 1.0), (500, -1.5), (1500, 2.5), (2500, 3.4), (4500, 2.0), (12000, 1.0)])
    side = volts_from_db(-30 + 3.4 * wobble(15)) * filtered(side, tint)
    return band_limit(np.array([mid + side, mid - side]))


dry = scene()
out = record(dry)
to_wav(out)
```